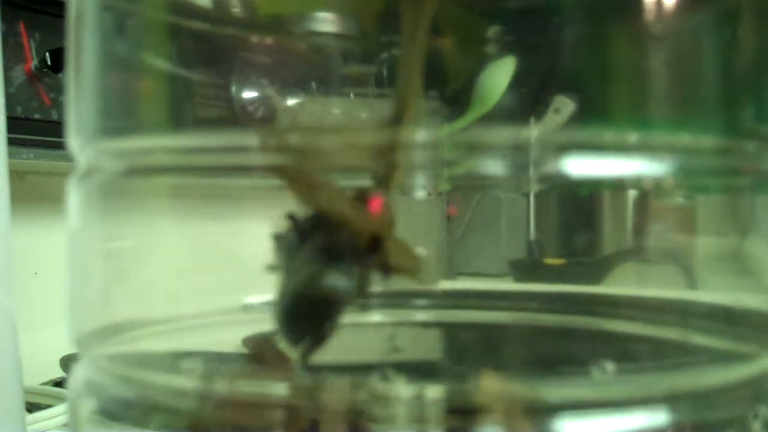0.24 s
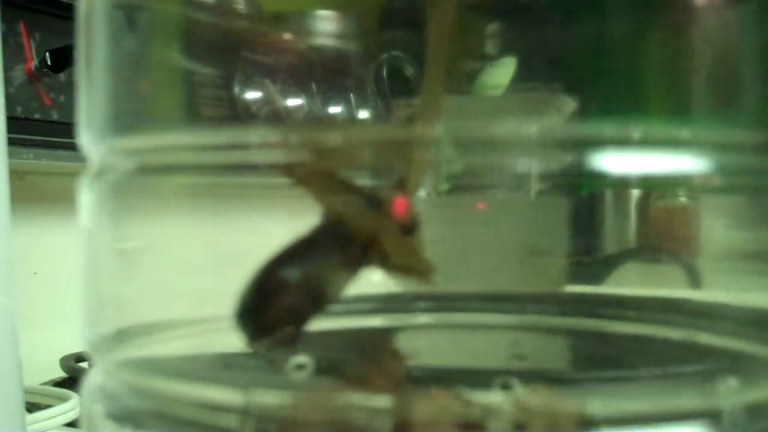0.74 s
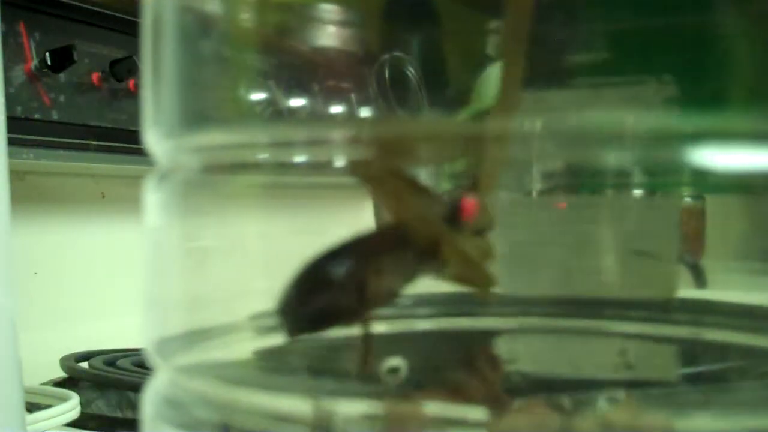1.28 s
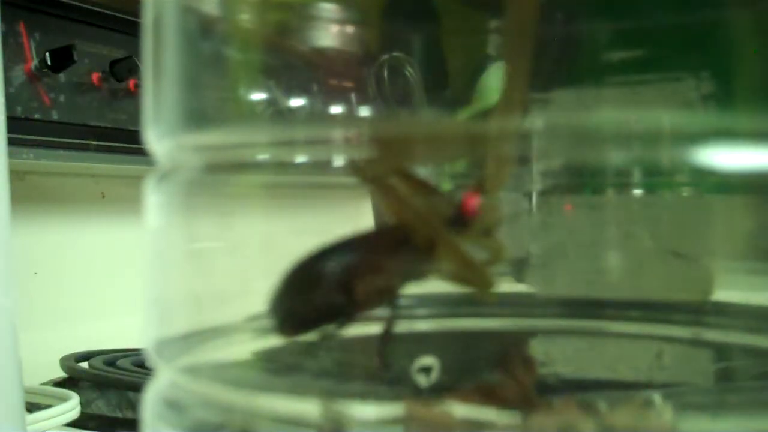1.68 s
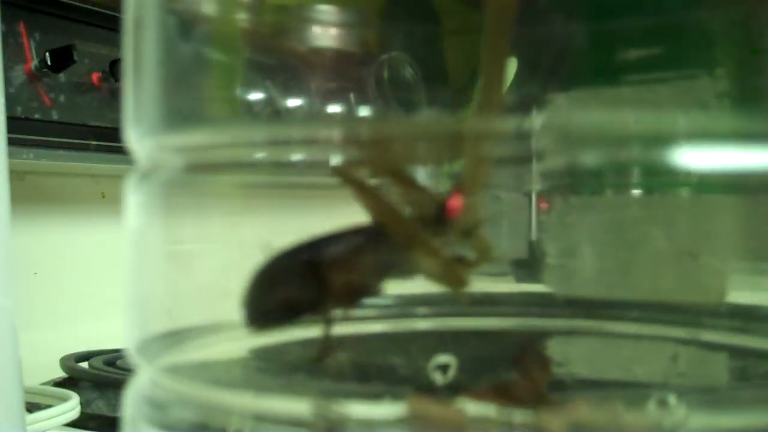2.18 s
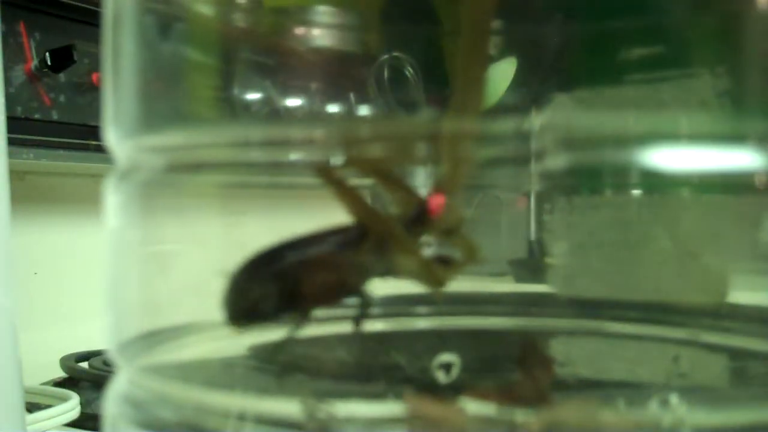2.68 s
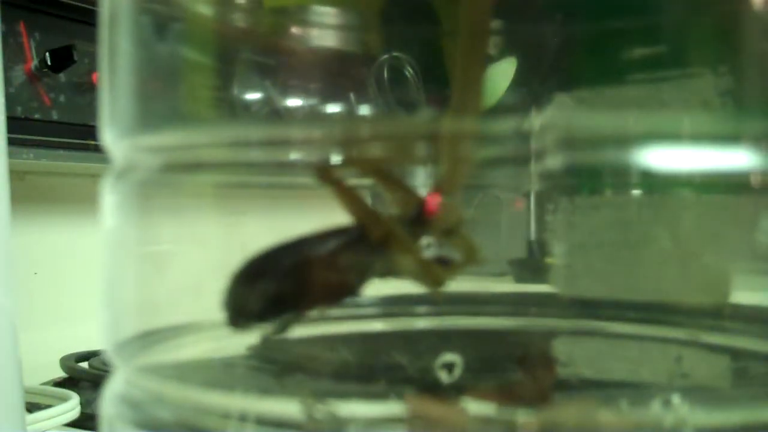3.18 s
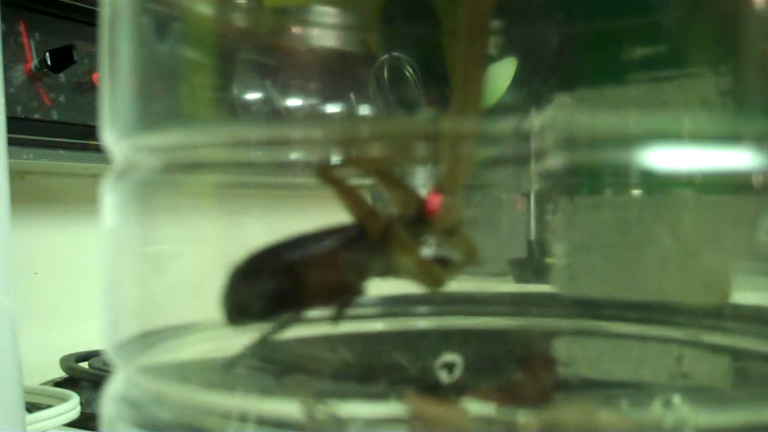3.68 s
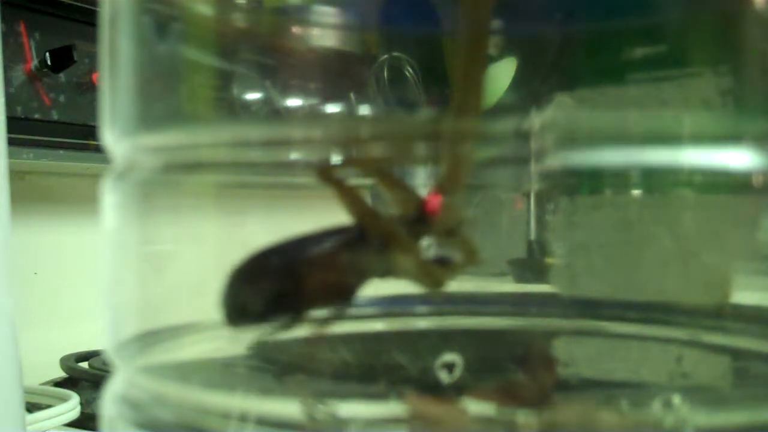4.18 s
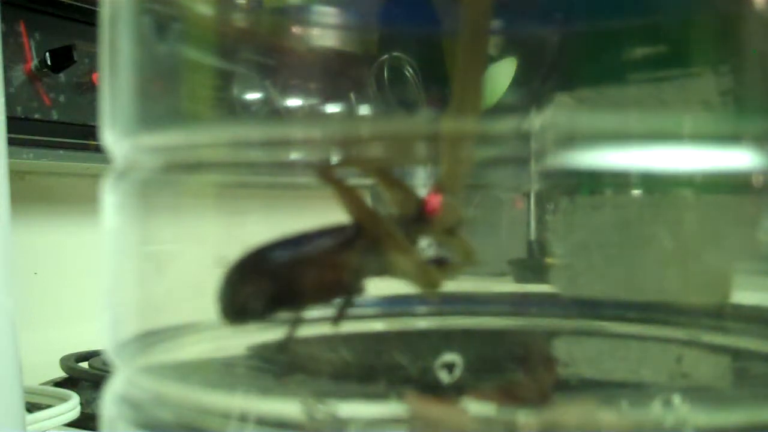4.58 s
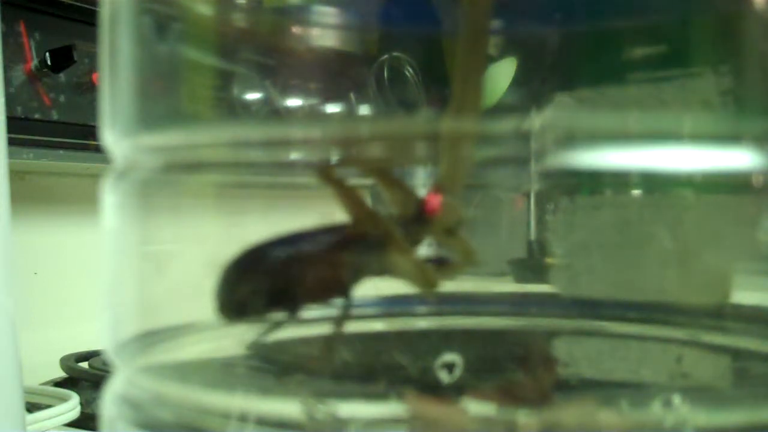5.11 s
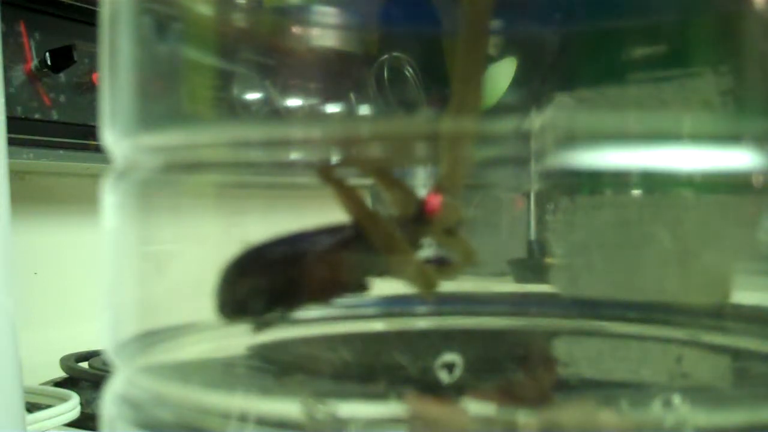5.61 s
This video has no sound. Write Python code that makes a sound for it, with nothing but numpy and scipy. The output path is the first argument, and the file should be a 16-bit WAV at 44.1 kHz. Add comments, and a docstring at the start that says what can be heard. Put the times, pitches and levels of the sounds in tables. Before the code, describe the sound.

A glass jar scrapes over a table in short gritty shoves and lands with a double knock, then beetle claws scratch faintly inside.

```python
"""A glass jar with a beetle in it is dragged over a table in short, gritty shoves that grow lighter and stop.
Its base sticks and slips and grit snaps under it, ringing glass and table. It is set down with a double
knock; then, in the quiet, the beetle's claws are heard scraping the glass about twice a second.
Indoors, on two close microphones, the left one brighter; room tone of hush and faint mains hum."""
import sys
import numpy as np
from scipy import signal
from scipy.fft import rfft, irfft
from scipy.io import wavfile
from scipy.ndimage import uniform_filter1d

SR = 44100
rng = np.random.default_rng(int(sys.argv[2]) if len(sys.argv) > 2 else 0)


def waveform_to_disk(signal):
    """Save audio, clipped to [-1, 1], as 16-bit WAV at the path in sys.argv[1]."""
    frames = np.transpose(np.atleast_2d(signal))
    scaled = np.clip(frames, -1, 1) * 32767
    samples = np.round(scaled).astype(np.int16)
    wavfile.write(sys.argv[1], SR, samples)


N = 257984
T = np.arange(N) / SR
HZ = np.fft.rfftfreq(N, 1 / SR)

# room tone: f/Hz, relative level/dB
HUSH_SPECTRUM = [(12, -45), (20, -4.5), (129, -8.5), (160, -9), (350, -6.5), (1100, -6.5), (2400, -11),
                 (4500, -12), (6000, -10), (7900, -14), (8700, -15.5), (13500, -17.5)]
MAINS_HUM = [(118.4, -85), (360.7, -81), (479.1, -84.5), (721.4, -77.5), (1200, -79), (1443, -82.5),
             (1680, -80)]
# soft low rustle in the room: t/s, level/dB
RUSTLE_LEVEL = [(3.62, -65), (3.88, -78), (4.02, -65), (4.2, -63), (4.5, -71), (4.95, -68), (5.3, -76),
                (5.85, -78)]
# the room across the microphone pair
ROOM_LIKENESS = [(60, -0.5), (180, 0.18), (540, 0.38), (1630, 0.087), (4900, 0.25), (14000, 0)]  # f/Hz, left-right correlation
ROOM_BALANCE = [(60, 2), (200, 6.5), (1000, 3.5), (3400, 3), (5500, -0.5), (7200, 4.5), (9000, 1),
                (14000, 0)]  # f/Hz, left over right/dB

# claw strokes: t/s, hold/s, level/dB, share of the power that rings the jar
CLAW_STROKES = [(2.6, 0.084, -57, 0.7), (3.19, 0.083, -60, 0.75), (3.78, 0.064, -57.5, 0.8),
                (4.195, 0.015, -67, 0.6), (4.33, 0.11, -59, 0.8), (4.72, 0.025, -63.5, 0),
                (4.85, .03, -63, 0), (4.92, .105, -59, 0.63), (5.205, .03, -63, 0.1),
                (5.52, .075, -64.5, .3)]
# narrow rings of the jar and dry rasp of the claw: f/Hz, width/Hz, relative level/dB
CLAW_RING = [(2430, 180, -5.5), (3280, 84, -2), (3810, 100, -3.5), (4510, 160, -0.5), (5530, 250, -1),
             (6300, 120, -10), (7110, 200, -2), (8330, 70, -10)]
CLAW_RASP = [(3680, 1800, -10.5), (7200, 1140, -4)]

# blows and bounces of jar on table: t/s, thud/dB, click/dB
BLOWS = [(3.5246, -44, -29), (3.526, -22.5, -34), (3.539, -50, -40), (3.542, -51, -33.5),
         (3.5424, -22, -33), (3.554, -51, -57), (3.566, -53, -57), (3.576, -54, -53)]
# modes a blow rings: f/Hz, relative level/dB, t60/s
KNOCK_MODES = [(50, -13, 0.13), (145.4, -16, 0.27), (193.7, -18.5, 0.28), (278, -8.5, 0.022),
               (391, -2.5, 0.061), (700, -14, 0.013), (784, -9.5, 0.013), (1010, -5, 0.009),
               (1220, -12.5, 0.034), (1780, -20, 0.035), (3570, -7, 0.012), (4430, -24, 0.025),
               (5180, -24, 0.032), (6420, -6, 0.0073), (7030, -12, 0.011)]

# resonances from the table up through the jar to the finest grit: f/Hz, width/Hz, relative level/dB
TABLE_MODES = [(118, 175, -13.5), (220, 93, -3.5), (357, 63, 1), (420, 88, 2), (610, 320, -1)]
BODY_MODES = [(739, 234, -8.5), (980, 110, -0.5), (1092, 81, 0.5), (1304, 124, -3), (1858, 146, -9.5),
              (2310, 128, -9)]
WALL_MODES = [(2670, 1000, -13), (3206, 79, -4), (3590, 230, -1.5), (4290, 360, -1.5), (4460, 420, -3),
              (5175, 260, -3)]
GLASS_MODES = [(5550, 230, 0), (5880, 430, 3.5), (6400, 590, 0.5), (7100, 790, -5)]
TOP_MODES = [(7270, 910, 1.5), (7460, 280, 9), (7990, 370, 8), (8150, 1500, -8)]
FIZZ_BANDS = [(8480, 1000, 5.5), (11070, 7400, -10)]
# shoves: t/s, hold/s, rubbing level/dB, glass ring over rubbing/dB, top ring over rubbing/dB
SHOVES = [(0.008, 0.044, -42, -2.5, -2), (0.061, 0.021, -38.5, -1, -7.5), (0.161, 0.022, -41, -0.5, -6),
          (0.209, 0.027, -47.5, -3.5, -9), (0.283, 0.053, -38.5, -4, -5.9),
          (0.411, 0.0067, -40.5, -1.5, -4.1), (0.435, 0.021, -41.5, -4.8, -5.5),
          (0.494, 0.018, -42.0, -9, -11.4), (0.537, 0.047, -43.5, -6, -6.5), (0.589, 0.029, -43, -0.5, -7),
          (0.686, 0.027, -45.5, -1.6, -7), (0.718, 0.041, -39.5, -1, -8.5), (0.767, 0.04, -46.5, 1.3, -10),
          (0.825, 0.11, -46.5, 3.5, -6.5), (0.955, 0.02, -43, 4, -2), (1.045, 0.034, -46, -3, -6.6),
          (1.088, 0.037, -39.5, 2, -4.2), (1.202, 0.048, -44, -2, -10), (1.319, 0.069, -49.5, -5.5, -12),
          (1.379, 0.083, -54, -0.5, -9), (1.521, 0.047, -43.5, -4, -6), (1.603, 0.022, -52.5, -8, -7),
          (1.653, 0.019, -47, -5.5, -7.7), (1.698, 0.0026, -52.5, -9.5, -9),
          (1.743, 0.017, -53.5, -6.5, -6.5), (1.825, 0.0054, -50.5, -7, -6.5),
          (1.857, 0.028, -50.5, -5.5, -7), (1.997, 0.032, -47, -8, -9.5), (2.115, 0.047, -47.5, -4.5, -10),
          (2.189, 0.061, -54, -8, -8), (2.246, 0.022, -51, -2.5, -4.6), (2.295, 0.054, -52.5, -11.5, -9),
          (2.369, 0.039, -51.5, -8, -8.7), (2.477, 0.058, -56, -7.5, -8), (2.554, 0.037, -53, -5.5, -8),
          (2.628, 0.047, -54.5, -9, -9), (2.691, 0.043, -60.5, -6, -6), (2.77, 0.0063, -58.5, -7, -3.5),
          (2.826, 0.058, -62.5, -3.5, -5.5), (2.922, 0.003, -62, -5, -7), (2.982, 0.049, -61, -7.5, -8)]
# slight sliding between shoves: t/s, rubbing level/dB
CREEP_LEVEL = [(0, -48), (0.25, -51.5), (0.6, -45), (1.1, -49), (1.5, -55), (1.75, -85), (2.1, -64),
               (2.4, -71), (3.1, -90)]
# boom of the table: t/s, level over rubbing/dB
TABLE_BOOM = [(0, -8.5), (.5, -9.5), (1.0, -8), (1.5, -5), (1.8, 0.5), (2.2, -5), (2.6, -1.5), (3.1, 2)]
# sharp ticks on the glass, grit under the dragged jar, then two claw ticks in the quiet:
# t/s, drive to wall/dB, to glass/dB, to top ring/dB
GLASS_TICKS = [(0.0137, -54, -41, -33), (0.0196, -44, -45, -29), (0.0295, -38, -33, -25),
               (0.0667, -51, -37, -34), (0.0789, -32, -26, -26), (0.0818, -36, -41, -32),
               (0.1737, -40, -43, -40), (0.2907, -43, -42, -34), (0.3159, -41, -29, -28),
               (0.3236, -49, -40, -33), (0.4126, -55, -34, -39), (0.5911, -45, -35, -39),
               (0.9528, -36, -22, -25), (0.9632, -36, -29, -34), (1.0867, -42, -33, -38),
               (1.2193, -40, -38, -41), (1.2835, -39, -42, -39), (1.8569, -58, -53, -53),
               (1.9956, -50, -52, -46), (2.0163, -61, -47, -44), (2.1091, -47, -44, -41),
               (2.2459, -50, -44, -50), (2.3423, -56, -47, -52), (2.4289, -64, -51, -50),
               (2.4754, -58, -54, -52), (2.7721, -64, -55, -62), (2.8697, -67, -54, -59),
               (4.1921, -53, -55, -55), (5.6527, -59, -50, -71)]
# the jar across the close pair
JAR_LIKENESS = [(60, 0.3), (130, 0.79), (290, 0.96), (1390, 0.95), (3060, 0.87), (6000, 0.55), (8000, 0.43),
                (14000, .2)]  # f/Hz, left-right correlation
JAR_BALANCE = [(200, 0), (2350, 0), (4340, 2), (5900, -1.5), (6800, 11), (7600, 11.5), (9000, 10.5),
               (12000, 7.5)]  # f/Hz, left over right/dB
JAR_LEAD = [(1000, 0.0), (4050, -0.35), (7240, -1.05), (8100, -2), (10600, -1.8)]  # f/Hz, phase lead of the left/rad


def gain_of(db):
    return 10 ** (np.asarray(db) / 20)


def spectral_curve(points):
    """A curve through the points on a log frequency axis."""
    hz, value = np.transpose(points)
    return np.interp(np.log(HZ + 1), np.log(hz + 1), value)


def ring(modes, order=1):
    """Response of damped modes of alternate sign, with power gain 1 for white noise."""
    response = sum((-1) ** k * gain_of(db) * (1j * HZ * width / (hz**2 - HZ**2 + 1j * HZ * width)) ** order
                   for k, (hz, width, db) in enumerate(modes))
    return response / np.sqrt(np.mean(abs(response) ** 2))


def mic_pair(spectra, likeness, balance, lead_rad=0):
    """Two spectra are blended into left and right microphone signals by likeness, balance and phase."""
    shared = spectral_curve(likeness)
    tilt = gain_of(spectral_curve(balance) / 2)
    right = shared * spectra[0] * np.exp(-1j * lead_rad) + np.sqrt(1 - shared ** 2) * spectra[1]
    return irfft([spectra[0] * tilt, right / tilt], N)


def slips(per_s, spread_db, decay_s, steady):
    """Envelope of stick-slip contact, rms 1: short catches of very unequal size over a steady rub."""
    sizes = gain_of(spread_db * np.minimum(rng.exponential(1, N), 4)) * (rng.random(N) < per_s / SR)
    catches = signal.lfilter([1], [1, -np.exp(-1 / (decay_s * SR))], sizes)
    envelope = steady + catches / np.sqrt(np.mean(catches ** 2))
    return envelope / np.sqrt(np.mean(envelope ** 2))


def bursts(times, db, decay_s):
    """Envelope of sudden, quickly dying contacts."""
    hits = np.zeros(N)
    np.add.at(hits, np.round(times * SR).astype(int), gain_of(db))
    return signal.lfilter([1], [1, -np.exp(-1 / (decay_s * SR))], hits)


def pushes(grips, holds, db, rise_db_per_s, fall_db_per_s, bend_s, rest_db=-120):
    """Level in dB of contacts that grip, hold and let go; the slopes steepen away from the hold."""
    power = np.ones(N) * gain_of(rest_db) ** 2
    for at, hold, level_db in zip(grips, holds, db):
        near = slice(max(round((at - 0.3) * SR), 0), round((at + hold + 0.3) * SR))
        early, late = np.maximum(at - T[near], 0), np.maximum(T[near] - at - hold, 0)
        lost_db = rise_db_per_s * early * (1 + early / bend_s) + fall_db_per_s * late * (1 + late / bend_s)
        power[near] += gain_of(level_db - lost_db) ** 2
    return 10 * np.log10(power)


def room_tone(hush_db=-59, left_delay_s=6e-5):
    """Behind the jar: steady hush, a low rustle that comes and goes, and wavering mains hum."""
    colour = gain_of(spectral_curve(HUSH_SPECTRUM))
    colour *= gain_of(hush_db) / np.sqrt(np.mean(colour ** 2))
    swell = gain_of(np.interp(T, *np.transpose(RUSTLE_LEVEL), left=-99))
    rustle = rfft(rng.standard_normal((2, N)) * swell) * ring([(400, 144, -8.5), (1210, 1660, -15.5)])
    wavers = uniform_filter1d(rng.standard_normal((len(MAINS_HUM), N)), SR // 4) * 60
    hum = sum(gain_of(db + 1.5 + waver_db) * np.sin(2 * np.pi * (hz * T + rng.random()))
              for (hz, db), waver_db in zip(MAINS_HUM, wavers))
    hush = rfft(rng.standard_normal((2, N))) * colour
    return mic_pair(hush + rustle, ROOM_LIKENESS, ROOM_BALANCE, -2 * np.pi * HZ * left_delay_s) + hum


def beetle_claws():
    """Inside the jar, claws dig in slowly and let go at once, rasping drily and ringing the glass."""
    grips, holds, db, share = np.transpose(CLAW_STROKES)
    share = np.clip(share, 0.01, 0.99)
    edges = dict(rise_db_per_s=98, fall_db_per_s=500, bend_s=0.14)
    ringing = gain_of(pushes(grips, holds, db + 10 * np.log10(share), **edges))
    rasping = gain_of(pushes(grips, holds, db + 10 * np.log10(1 - share), **edges))
    scrape = rng.standard_normal((2, N)) * slips(per_s=1100, spread_db=8, decay_s=0.0015, steady=4.3)
    spectra = rfft(scrape * ringing) * ring(CLAW_RING, order=2) + rfft(scrape * rasping) * ring(CLAW_RASP)
    return mic_pair(spectra, likeness=[(2000, 0.82), (8000, 0.15)],
                    balance=[(3000, 1.1), (6000, 1.2), (7500, 13.8)])


def jar_knocks():
    """The jar lands near the microphones: thuds ring the low modes and table, clicks the glass."""
    t, tones = T[:SR // 3], np.zeros(N)
    for at, thud_db, click_db in BLOWS:
        for k, (hz, db, t60) in enumerate(KNOCK_MODES):
            drive_db = thud_db - 3 if hz < 2500 else click_db + 0.5
            attack = 1 - np.exp(-t * hz / 0.063)  # swells within a cycle
            decay = gain_of(drive_db + db - 60 * t / t60)
            tones[round(at * SR):][:len(t)] += (-1) ** k * attack * decay * np.sin(2 * np.pi * hz * t)
    at, thud_db, click_db = np.transpose(BLOWS)
    shake = rng.standard_normal((2, N))
    rumble = rfft(shake * bursts(at, thud_db - 20.5, 0.017)) * ring(TABLE_MODES)
    rattle = rfft(shake * bursts(at, click_db - 21, 0.0046)) * ring(WALL_MODES + GLASS_MODES + TOP_MODES)
    crack_colour = ring([(1960, 2200, -9), (6900, 2700, -7)])
    crack = rfft(shake[::-1] * bursts(at, click_db - 7, 0.00061)) * crack_colour
    bass_cut = (1j * HZ / (150 + 1j * HZ)) ** 2  # a small jar radiates little deep bass
    return mic_pair(rfft(tones) * bass_cut + rumble + rattle + crack, JAR_LIKENESS, JAR_BALANCE)


def jar_drag_and_ticks(wall_follows_glass=0.63):
    """Close up, stick-slip rubbing drives jar and table; grit, and later a claw, ticks on the glass."""
    grips, holds, db, glass_over_db, top_over_db = np.transpose(SHOVES)
    edges = dict(rise_db_per_s=734, fall_db_per_s=648, bend_s=0.6)
    creep_db = np.interp(T, *np.transpose(CREEP_LEVEL), right=-99)
    rub_db = pushes(grips, holds, db, **edges, rest_db=creep_db)
    glass_db = pushes(grips, holds, db + glass_over_db, **edges, rest_db=creep_db - 5)
    top_db = pushes(grips, holds, db + top_over_db, **edges, rest_db=creep_db - 7)
    table_db = rub_db + np.interp(T, *np.transpose(TABLE_BOOM))
    wall_db = rub_db + wall_follows_glass * (glass_db - rub_db) - 2.5
    fizz_db = (top_db + glass_db) / 2 - 9
    coarse = slips(per_s=150, spread_db=2.5, decay_s=0.013, steady=3)
    fine = slips(per_s=170, spread_db=6.5, decay_s=0.00089, steady=5.8)
    at, wall_tick_db, glass_tick_db, top_tick_db = np.transpose(GLASS_TICKS)
    parts = [  # response, rubbing envelope, tick envelope
        (ring(TABLE_MODES), coarse * gain_of(table_db), 0),
        (ring(BODY_MODES), coarse * gain_of(rub_db), 0),
        (ring(WALL_MODES), fine * gain_of(wall_db), bursts(at, wall_tick_db + 10, 0.0004)),
        (ring(GLASS_MODES, order=2), fine * gain_of(glass_db), bursts(at, glass_tick_db + 7, 0.00051)),
        (ring(TOP_MODES, order=2), fine * gain_of(top_db), bursts(at, top_tick_db + 4.5, 0.00073)),
        (ring(FIZZ_BANDS), fine * gain_of(fizz_db), bursts(at, top_tick_db - 9, 0.00061))]
    tick_noise = rng.choice([-1., 1.], (2, N))
    spectra = sum(rfft(rng.standard_normal((2, N)) * rub + tick_noise * tick) * response
                  for response, rub, tick in parts)
    return mic_pair(spectra, JAR_LIKENESS, JAR_BALANCE, spectral_curve(JAR_LEAD))


def scene():
    """Jar, beetle and room as they reach the pair at the table."""
    return jar_drag_and_ticks() + jar_knocks() + beetle_claws() + room_tone()


def record(dry):
    """The recorder's band ends at 14350 Hz."""
    low_pass = signal.firwin(511, 14350, window=("kaiser", 9), fs=SR)
    return signal.oaconvolve(dry, low_pass[None], "same")


dry = scene()
out = record(dry)
waveform_to_disk(out)
```